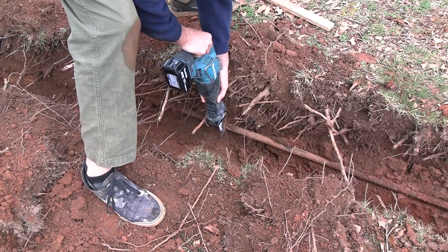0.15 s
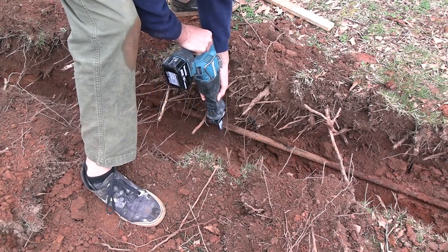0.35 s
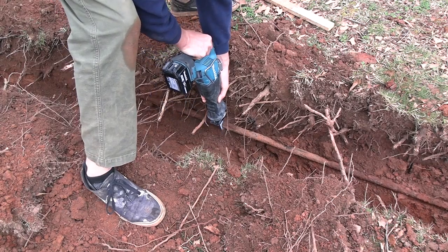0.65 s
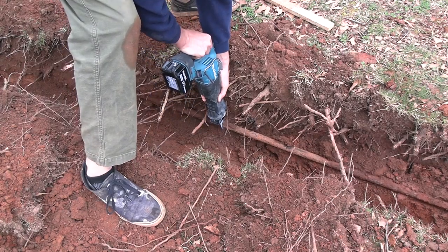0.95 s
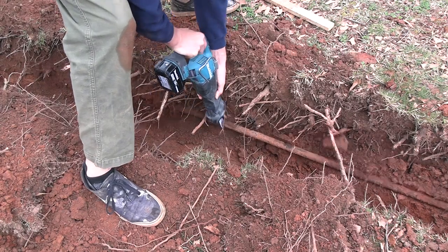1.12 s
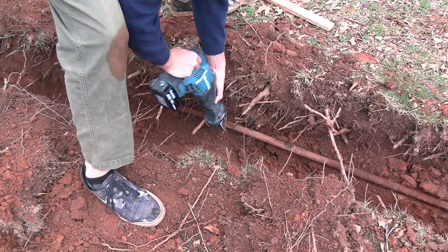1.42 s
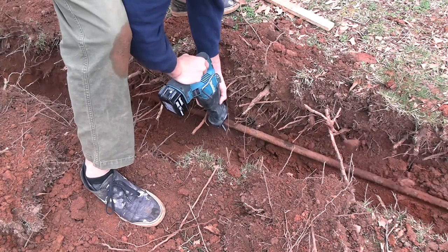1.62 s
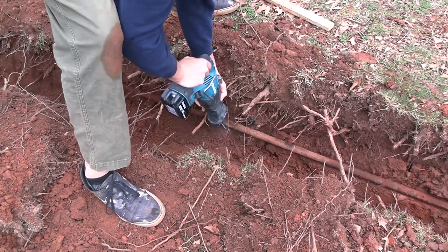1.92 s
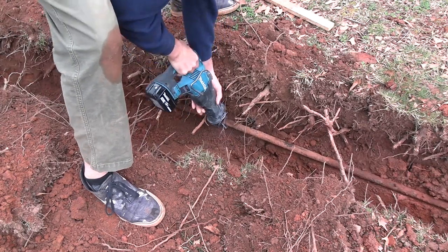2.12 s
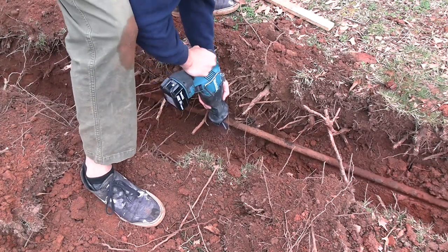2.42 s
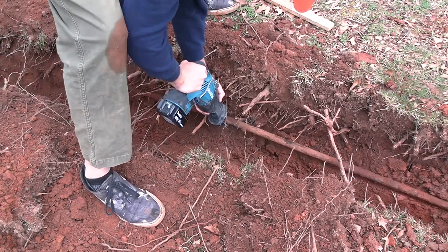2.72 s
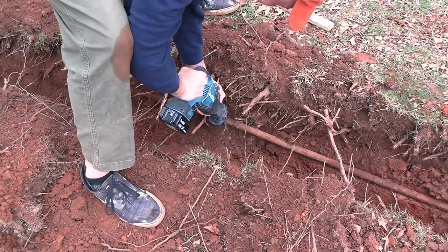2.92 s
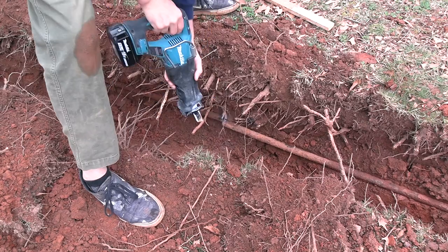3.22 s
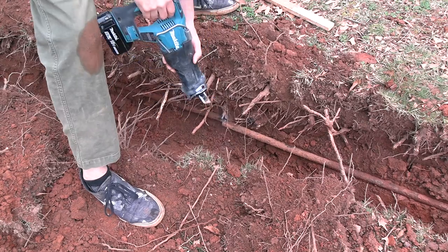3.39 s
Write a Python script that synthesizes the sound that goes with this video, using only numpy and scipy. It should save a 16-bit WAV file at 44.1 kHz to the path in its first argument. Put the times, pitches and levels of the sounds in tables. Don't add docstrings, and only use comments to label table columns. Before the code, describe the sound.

Close, dry reciprocating saw outdoors: steady geared whir, then gritty metallic grinding with knocks, a brief stop, a click and second cut with cracks; finally a sudden change to open air, distant engine hum and bird whistles.

```python
import sys
import numpy as np
from scipy import signal
from scipy.fft import rfft, irfft
from scipy.io import wavfile

SR = 44100
rng = np.random.default_rng(int(sys.argv[2]) if len(sys.argv) > 2 else 0)


def gain_from_decibels(decibels):
    exponent = np.asarray(decibels, float) / 20
    return 10 ** exponent


def int16_out(signal):
    q = np.round(np.clip(np.atleast_2d(signal).T, -1, 1) * 32767)
    wavfile.write(sys.argv[1], SR, q.astype(np.int16))


N = 156555
T = np.arange(N) / SR
OPEN_S = 3.186

# time_s, level_db
DRIVE = [(0, -32.5), (1.31, -31.5), (1.325, -44.5), (1.365, -34), (1.385, -29.5), (2.05, -29),
         (2.057, -45.5), (2.11, -61.5), (2.15, -82), (2.3, -105), (2.312, -56.5), (2.345, -27),
         (2.58, -30.5), (2.635, -35), (2.69, -30), (3.03, -33), (3.118, -38), (3.14, -79)]
# time_s, load_0_to_1
LOAD = [(0, 0.01), (1.0, 0.05), (1.15, 0.31), (1.42, 0.34), (1.7, 0.74), (2.05, 0.86), (2.4, 0.35),
        (2.6, 1), (2.64, 0.24), (2.69, 0.63), (2.79, 1), (2.83, 0.32), (2.87, 0.43), (2.99, 0.2),
        (3.04, 0.25)]
# pitch_hz, level_db, t60_s
PIPE = [(258, -29, .015), (360, -33, 0.0065), (464, 0, 0.033), (569, 10, 0.014), (739, -1, 0.022),
        (853, -1, 0.054), (1970, -18, 0.0035)]


def at_hz(points, hz):
    return np.interp(np.log(hz + 1), np.log(np.array(points)[:, 0]), np.array(points)[:, 1])


def rms_one(x):
    return x / np.sqrt(np.mean(x ** 2) + 1e-20)


def in_time(rows):
    s, *columns = np.transpose(rows)
    return [np.interp(T, s, c) for c in columns]


def colour(x, spectrum):
    hz = np.arange(N // 2 + 1) * SR / N
    low_fall = 1 + (spectrum[0][0] / (hz + 1)) ** 4
    return irfft(rfft(x) * gain_from_decibels(at_hz(spectrum, hz)) / low_fall, N)


def drift(rate_hz):
    return np.interp(T * rate_hz * 2, np.arange(999), rng.standard_normal(999))


def cut_off(x, hz, kind, order=4):
    return signal.sosfilt(signal.butter(order, hz, kind, fs=SR, output="sos"), x)


def ring(clicks, hz, t60):
    r, w = gain_from_decibels(-60 / (t60 * SR)), 2 * np.pi * hz / SR
    return signal.lfilter([0, np.sin(w)], [1, -2 * r * np.cos(w), r * r], clicks + 1e-18)


def body(clicks, peaks):
    out = np.zeros(N)
    for k, (hz, width_hz, db) in enumerate(peaks):
        out += (-1) ** k * gain_from_decibels(db) * np.sqrt(width_hz) * ring(clicks, hz, 1.29 / width_hz)
    return rms_one(out)


def sweep(x, hz, width_hz):
    turn = np.exp(2j * np.pi * np.cumsum(hz) / SR)
    slow = signal.lfilter([1], [1, -np.exp(-np.pi * width_hz / SR)], x / turn)
    return rms_one((slow * turn).real)


def spikes(s, db):
    out = np.zeros(N)
    out[(np.array(s) * SR).astype(int)] = gain_from_decibels(np.array(db))
    return out


def quiet_air():
    # pitch_hz, level_db_per_hz
    air_spectrum = [(35, -64), (60, -26), (217, -7), (566, -2), (2470, -10.5), (3850, -18), (10500, -18),
                    (16000, -39)]
    return gain_from_decibels(-63.5) * cut_off(rms_one(colour(rng.standard_normal(N), air_spectrum)), 120, "high", order=3)


def ground_shake():
    rumble = rms_one(cut_off(rng.standard_normal(N), [40, 170], "band", order=2))
    return gain_from_decibels(in_time(DRIVE)[0] - 45.5) * (in_time(LOAD)[0] + 0.22) * rumble


def wind():
    # pitch_hz, level_db_per_hz
    open_spectrum = [(18, -60), (30, -19), (106, -2), (495, -9), (656, -5.5), (1350, -16.5), (1790, -12.5),
                     (5270, -29), (14000, -45.5)]
    bump_db = 2.9 * np.exp(-np.abs(T - OPEN_S) / 0.033)
    return gain_from_decibels(-45 + bump_db + 0.85 * drift(5.2)) * rms_one(colour(rng.standard_normal(N), open_spectrum))


def engine_hum():
    # pitch_hz, rms_db
    partials = [(107.7, -48.5), (226.1, -56), (430.7, -71), (640.6, -61)]
    out = np.zeros(N)
    for hz, db in partials:
        level = gain_from_decibels(db + 3.0 + 2.0 * drift(3.2))
        out += level * np.sin(2 * np.pi * np.cumsum(hz * (1 + 0.01624 * drift(9.5))) / SR)
    return out


def insect():
    chirr = sweep(rng.standard_normal(N), np.full(N, 5150), 180)
    return gain_from_decibels(-63) * chirr * np.clip((3.33 - T) / 0.061, 0, 1)


def bird():
    # start_s, length_s, from_hz, to_hz, level_db
    song = [
        (3.18, .056, 1950, 1760, -49),
        (3.255, .03, 2100, 2600, -56),
        (3.282, .038, 1900, 2650, -39),
        (3.324, .031, 3450, 2300, -38),
        (3.383, .033, 3350, 4000, -40),
        (3.418, .029, 3800, 2000, -36),
        (3.437, .044, 2120, 1900, -43),
        (3.516, .046, 1600, 2650, -39),
    ]
    bends = [1.0, 1.0, .6, .55, 1.6, .8, .4, .55]
    swells = [.7, 1.0, 1.8, 1.0, 1.8, .55, .8, 1.6]
    out = np.zeros(N)
    for (s, length, hz0, hz1, db), bend, late in zip(song, bends, swells):
        u = np.clip((T - s) / length, 0, 1)
        hz = hz0 + (hz1 - hz0) * u ** bend
        out += gain_from_decibels(db + 5.0) * np.sin(np.pi * u ** late) * np.sin(2 * np.pi * np.cumsum(hz) / SR)
    breath = cut_off(rng.standard_normal(N), 1100, "low", order=2)
    out = out * (1 + 0.25 * drift(130.0) + 0.9 * breath)
    t = T[:SR // 2]
    wood_t60_s, leaves_t60_s = 0.99, .12
    decay = gain_from_decibels(-60 * t / wood_t60_s) + gain_from_decibels(-60 * t / leaves_t60_s)
    echo = cut_off(rng.standard_normal(SR // 2) * decay * (t > .004), 2690, "high", order=1)
    return out + gain_from_decibels(-3) * signal.fftconvolve(out, echo / np.sqrt(np.sum(echo ** 2)))[:N]


def ticks():
    # start_s, peak_db
    tick_rows = [(1.2685, -11), (1.7904, -3.5), (2.0644, -48), (2.0764, -42), (2.0868, -29), (2.16, -37.5),
                 (2.1764, -45), (2.306, -26), (2.3284, -16), (2.35, -25), (2.857, -7.5)]
    s, db = np.transpose(tick_rows)
    tail = np.exp(-np.arange(400) / SR / 0.0036) * rng.standard_normal(400)
    return cut_off(np.convolve(spikes(s, db - 14.0), tail)[:N], [1900, 11000], "band", order=2)


def scrapes(rows, gain_db):
    out = np.zeros(N)
    for s, db, hz in rows:
        noise = rng.standard_normal(600) * np.exp(-T[:600] / 0.0014)
        burst = ring(noise, hz, 24.0 / hz) + 1.3 * noise
        out[int(s * SR):int(s * SR) + 600] += gain_from_decibels(db + gain_db) * burst / np.abs(burst).max()
    return out


def cracks():
    # start_s, peak_db, ring_hz
    crack_rows = [(2.3475, -25, 1840), (2.3735, -19, 2000), (2.4346, -46, 3870), (2.519, -34, 3420),
                  (2.5331, -15, 2280), (2.559, -22, 2250), (2.595, -22, 3020), (2.7605, -23, 1900),
                  (2.835, -33, 1920), (2.859, -20, 2120), (2.8825, -27, 1990), (2.904, -27, 2270)]
    return scrapes(crack_rows, -2)


def sparks():
    # start_s, peak_db, ring_hz
    spark_rows = [
        (1.268, -22, 7560),
        (1.3158, -20, 7800),
        (1.383, -15, 7900),
        (1.3924, -13, 8510),
        (1.4052, -14, 7650),
        (1.4294, -30, 7900),
        (1.6089, -15, 9450),
        (1.6925, -21, 8400),
        (1.8346, -13, 8240),
        (1.8594, -10, 8300),
    ]
    return scrapes(spark_rows, -3)


def snags():
    # start_s, peak_db, brightness_db
    snag_rows = [(1.101, -36.5, -26), (1.122, -39, 5), (1.139, -32.5, -5), (1.163, -29.5, -7),
                 (1.185, -32, -6), (1.21, -27.5, 12), (1.234, -27.5, 9), (1.288, -26, -13),
                 (1.313, -44, -12), (1.331, -24.5, 7), (1.363, -35.5, -12), (1.393, -29, 19),
                 (1.403, -29, -14), (1.413, -21, 1), (1.441, -31, -9), (1.451, -28, -9),
                 (1.474, -23.5, -20), (1.498, -28, -9), (1.524, -26, -7), (1.545, -27.5, -11),
                 (1.57, -29.5, -4), (1.595, -29, -18), (1.618, -27.5, 4), (1.641, -25.5, -4),
                 (1.713, -25.5, -24), (1.74, -33, -12), (1.783, -24.5, -13), (1.795, -21.5, -10),
                 (1.807, -26, -9), (1.876, -27, -4), (1.903, -26.5, -23), (1.951, -27, -11),
                 (1.974, -26, -21), (2.014, -33, -6), (2.347, -48, -3), (2.373, -27.5, -20),
                 (2.384, -27.5, -9), (2.396, -27.5, -11), (2.419, -29, -9), (2.445, -24.5, -13),
                 (2.481, -32, -5), (2.531, -26, 8), (2.557, -30, -9), (2.596, -31, -6)]
    s, db, bright_db = np.transpose(snag_rows)
    out = np.zeros(N)
    for hz, mode_db, t60 in PIPE:
        blow_db = db + mode_db - 8.5
        upper_db = (hz > 1100) * (bright_db + 21.5)
        light = spikes(s + 0.00072, blow_db - 19.0)
        hard = spikes(s + 0.00288, blow_db + rng.normal(0, 1.25, len(s)) + upper_db)
        out += ring(hard - light, hz, t60)
    return out


def strokes():
    # time_s, reversals_hz
    speed = [(0, 110.5), (.28, 114.6), (.6, 109.8), (.79, 112.3), (1.03, 108), (1.1, 100), (1.22, 88),
             (1.42, 84), (2.05, 83.6), (2.3, 70), (2.42, 82), (2.6, 86), (2.64, 114), (2.72, 100),
             (2.78, 80), (2.87, 85), (2.91, 91), (2.97, 83)]
    count = np.cumsum(in_time(speed)[0]) / SR
    first, second = np.interp((1.418, 2.905), T, count)
    return count - np.where(T < 2.2, first, second) + 400


def gear_hiss(cutting):
    # pitch_hz, level_db_per_hz
    free_spectrum = [(300, -52), (700, -25), (1300, -13.5), (2500, -2), (4500, -3.5), (6500, -2), (9200, 2),
                     (15500, -7)]
    # pitch_hz, level_db_per_hz
    cut_spectrum = [(1000, -17), (1500, -28), (1900, -3), (2700, -6.5), (4000, -5), (6400, -8.5),
                    (8350, -4.5), (15800, -12)]
    free = gain_from_decibels(2) * rms_one(colour(rng.standard_normal(N), free_spectrum))
    cut = gain_from_decibels(-2.5) * rms_one(colour(rng.standard_normal(N), cut_spectrum))
    return free * np.sqrt(1 - cutting) + cut * np.sqrt(cutting)


def gear_tones(count):
    # multiple_of_reversal_rate, level_db
    orders = [(1, -33), (2, -8), (3, -13), (4, -2.5), (5, 0), (6, -3.5), (7, -7.5), (8, -4.5), (9, -2.5),
              (10, 1), (11, -9), (12, -2), (13, -11)]
    out = np.zeros(N)
    for m, db in orders:
        out += gain_from_decibels(-24 + db + 1.9 * drift(4.7)) * np.cos(2 * np.pi * (m * count + rng.random()))
    return out


def reversal_clack(turn, cutting):
    # pitch_hz, width_hz, level_db
    housing = [(1950, 400, -4), (2500, 400, 2), (3440, 1600, -2.5), (5250, 250, -1)]
    rattle = rng.standard_normal(500) * np.exp(-T[:500] / .0015)
    clack = gain_from_decibels(-7) * body(np.convolve(turn, rattle)[:N], housing) * (1 - .5 * cutting)
    return cut_off(clack, 1450, "high", order=6)


def tooth_grit(bites):
    # pitch_hz, width_hz, level_db
    blade = [(1970, 203, -5), (4030, 500, -4), (5000, 210, -8.5), (7470, 100, 1.5), (9570, 200, -10)]
    # time_s, rasp_hz, rasp_db, tip_ring_db, shank_ring_db
    bite = [(1.135, 8200, 9, -6, 4), (1.15, 8200, -4, 10.5, 7.5), (1.3, 7800, 6.5, 4, 3.5),
            (1.42, 8040, 8.5, 1.5, 6.5), (1.75, 7900, 6.5, 3, 5), (2.0, 8400, 0, 1, 7),
            (2.42, 8150, 8, 0, 6), (2.6, 8250, 4, 6.5, 3), (2.95, 8360, 10.5, -9, -3)]
    rasp_hz, rasp_db, tip_db, shank_db = in_time(bite)
    out = gain_from_decibels(rasp_db) * sweep(bites, rasp_hz, 620)
    out += gain_from_decibels(tip_db) * body(bites, [(10500, 780, 0)])
    for hz, width_hz, db in blade:
        shank = (3000 < hz < 4500) * shank_db
        out += gain_from_decibels(db + shank + 1.3 * drift(9.0)) * body(bites, [(hz, width_hz, 0)])
    return gain_from_decibels(-2.5) / 3 * out


def pipe_knock(hits, uneven):
    out = np.zeros(N)
    for hz, db, t60 in PIPE:
        hit_db = (700 < hz < 900) * 5.0 * (1 - uneven) + 4.0 * uneven ** 2 * drift(28.0)
        out += gain_from_decibels(db) * ring(hits * gain_from_decibels(hit_db), hz, t60)
    return rms_one(out)


def saw():
    # time_s, sharpness_0_to_1, unevenness_0_to_1
    stroke_curve = [(1.0, .3, .3), (1.15, .48, 1), (2.6, .48, 1), (2.66, .65, .15), (2.77, .75, .2),
                    (2.82, .4, .8), (2.86, .9, .2), (2.99, .9, .2), (3.03, .15, .5)]
    level_db, load = in_time(DRIVE)[0], np.clip(in_time(LOAD)[0], 0, 2)
    sharp, uneven = in_time(stroke_curve)
    cutting = np.clip(load * 2.95, 0, 1)
    count = strokes()
    k = count.astype(int)
    luck = np.clip(rng.standard_normal((999, 4)), -1.2, 1.2)
    turn = np.diff(k, prepend=k[0]) == 1

    since = count - 0.14 * uneven * luck[k, 0] + 0.11
    phase = since % 1 / .12
    burst = (phase * np.exp(1 - phase)) ** 2 * gain_from_decibels(4.0 * uneven * luck[since.astype(int), 1])
    swell = np.sqrt(1 - sharp + 4.5 * sharp * burst)
    soft = np.sqrt(1 - .6 * sharp + 2.4 * sharp * burst)

    teeth_per_s = 2500
    tooth_size = gain_from_decibels(4.6 * np.minimum(rng.exponential(1, N), 2.8)) * rng.choice([-1, 1], N)
    bites = (rng.random(N) < teeth_per_s / SR) * tooth_size * swell
    noise = gear_hiss(cutting) * soft + tooth_grit(bites) * cutting
    flutter = gain_from_decibels(1.6 * drift(15.0) * np.minimum(load + 0.08, 1) + 0.37 * drift(70.0))

    slaps = turn * cutting * sharp ** 2 * gain_from_decibels(4.0 * uneven * luck[k, 1])
    slap = gain_from_decibels(-12) * body(slaps, [(2000, 800, 3), (8300, 410, 3)])
    tones = gear_tones(count) * (1 - cutting + 3.8 * load * (1 - uneven) ** 2)

    delayed = (count - .3 * uneven ** 2 * (luck[k, 0] + 1.6) / 2).astype(int)
    late = np.diff(delayed, prepend=k[0]) == 1
    hits = late * gain_from_decibels(6.7 * uneven * (luck[k, 3] + 0.98 * (k % 2))) + 0.06 * uneven * bites
    knock = gain_from_decibels(-3.5) * load * (1 - 0.77 * uneven) * pipe_knock(hits, uneven)
    return gain_from_decibels(level_db) * (noise * flutter + slap + reversal_clack(turn, cutting) + tones + knock)


def trench_walls(mid, gate):
    # pitch_hz, side_minus_mid_db
    wall_spectrum = [(150, -24), (600, -21), (2500, -22), (3700, -14), (5000, -5), (6500, -4), (9000, -9),
                     (14000, -13)]
    spread = rfft(rng.standard_normal(1500) * np.exp(-T[:1500] / .01), N)
    walls = irfft(rfft(mid) * spread / np.abs(spread) ** 0.79, N) * drift(12)
    lean = -.25 * mid * (1 - 8.5 * gate)
    return colour(walls * np.std(mid) / np.std(walls) + lean, wall_spectrum)


def scene():
    gate = np.clip((T - OPEN_S) / 0.0028, 0, 1)
    near = cut_off(saw() + snags() + ticks() + cracks() + sparks(), 269, "high", order=5)
    near += quiet_air() + ground_shake()
    far = cut_off(wind() + engine_hum() + bird() + insect(), 13000, "low", order=12)
    mid = near * (1 - gate) + far * gate
    side = trench_walls(mid, gate)
    return np.array([mid + side, mid - side])


def low_pass(x):
    return signal.sosfilt(signal.butter(12, 16390, fs=SR, output="sos"), x)


def record(dry):
    top = signal.cheby2(14, 70, 15900 + 500, fs=SR, output="sos")
    mix = signal.sosfilt(top, 0.26 * np.tanh(dry / 0.32))
    return low_pass(mix)


dry = scene()
out = record(dry)
int16_out(out)
```